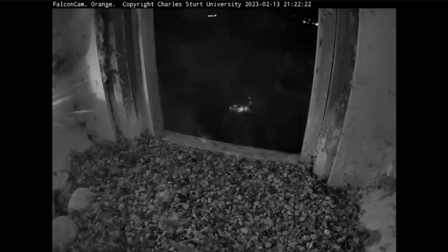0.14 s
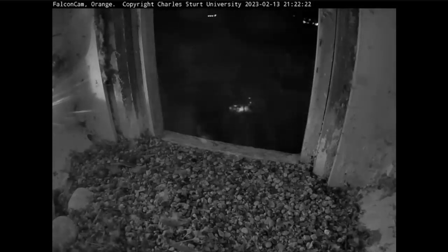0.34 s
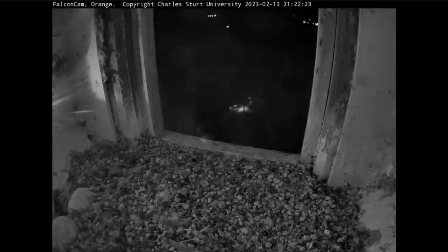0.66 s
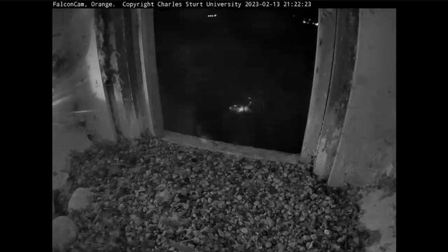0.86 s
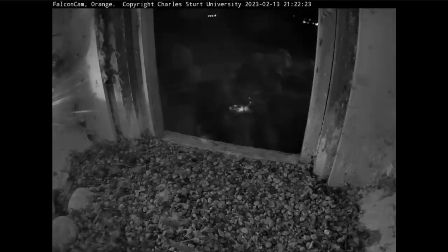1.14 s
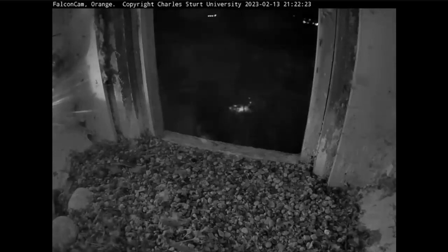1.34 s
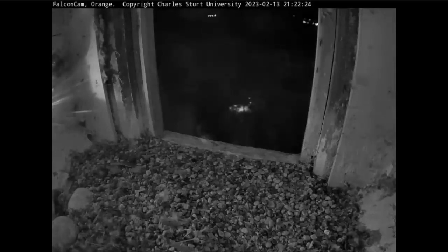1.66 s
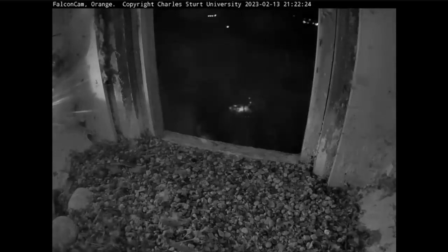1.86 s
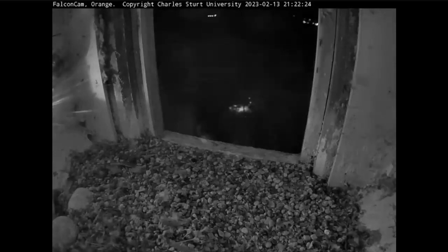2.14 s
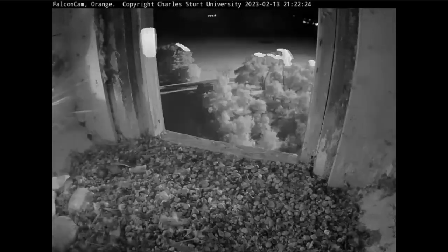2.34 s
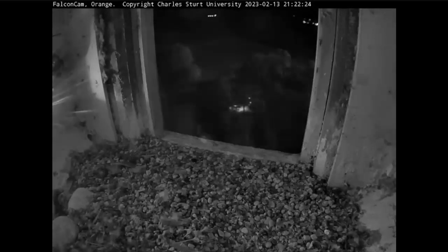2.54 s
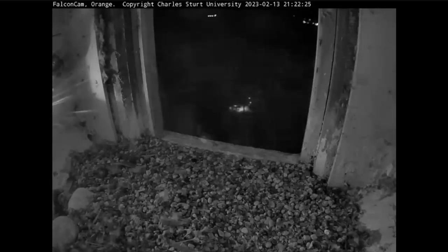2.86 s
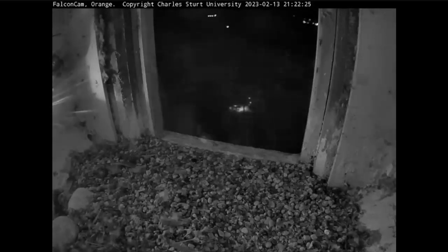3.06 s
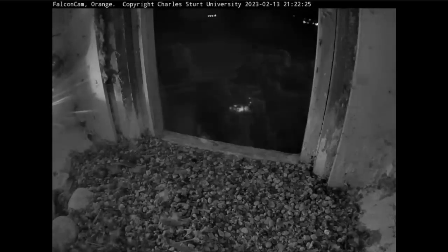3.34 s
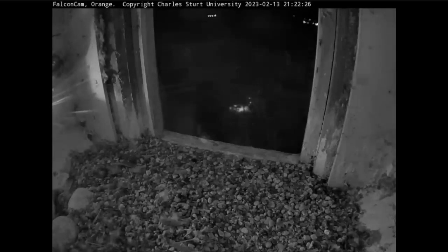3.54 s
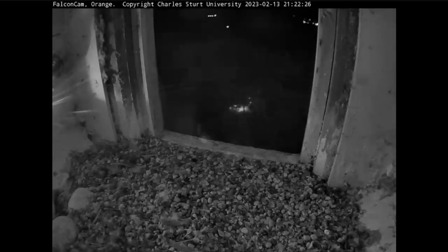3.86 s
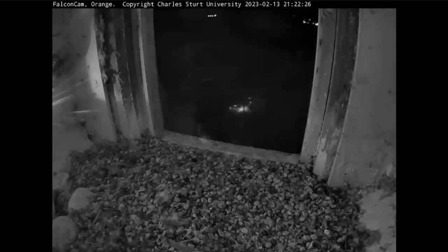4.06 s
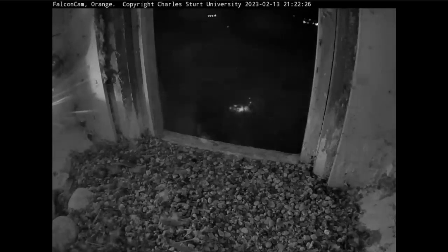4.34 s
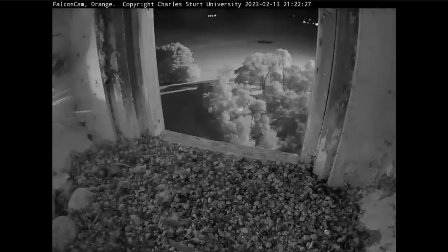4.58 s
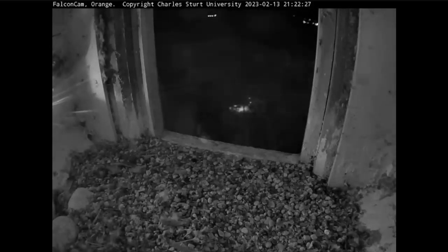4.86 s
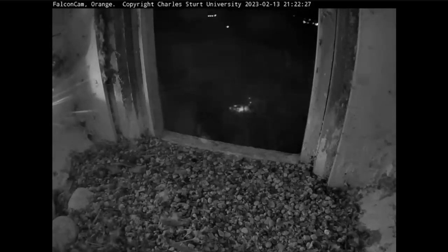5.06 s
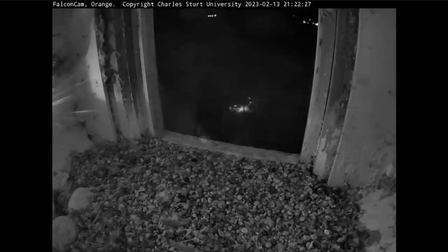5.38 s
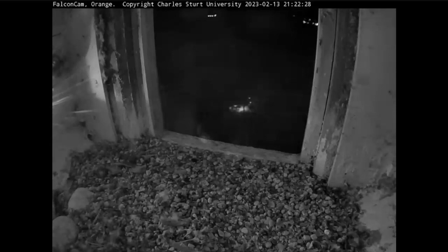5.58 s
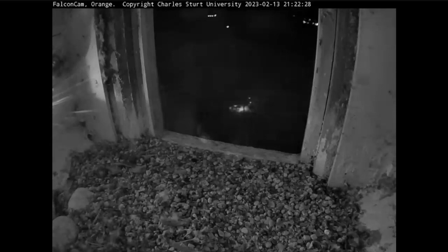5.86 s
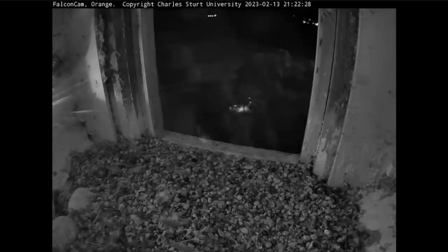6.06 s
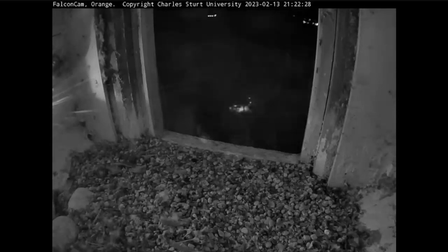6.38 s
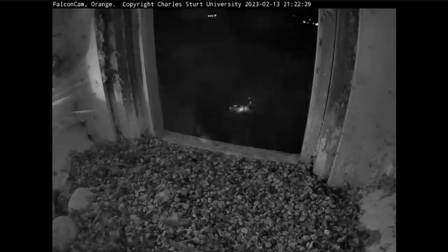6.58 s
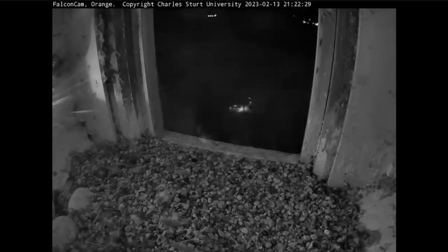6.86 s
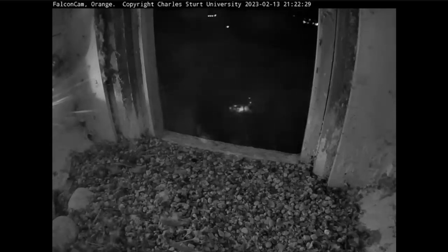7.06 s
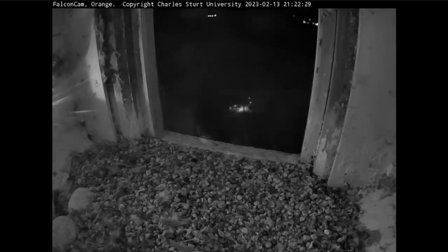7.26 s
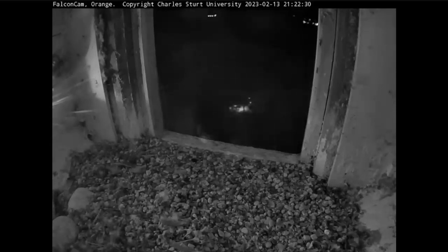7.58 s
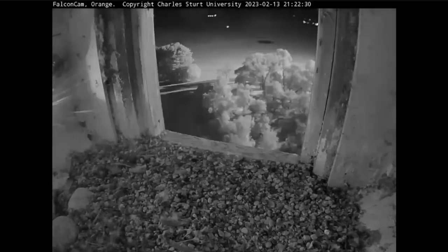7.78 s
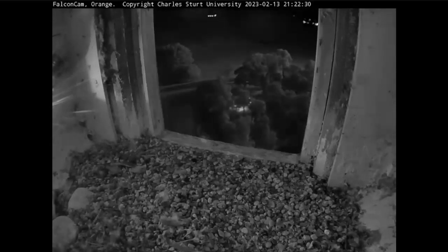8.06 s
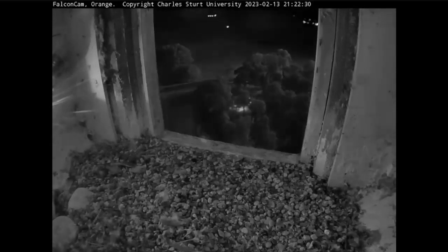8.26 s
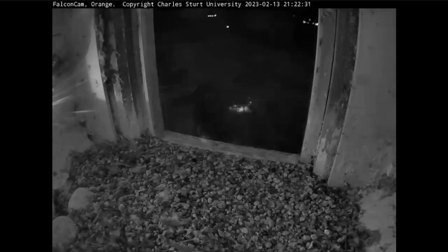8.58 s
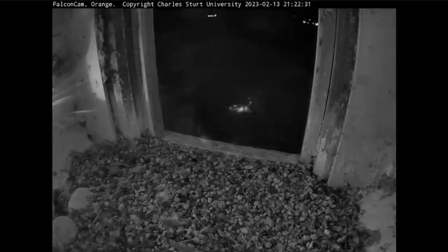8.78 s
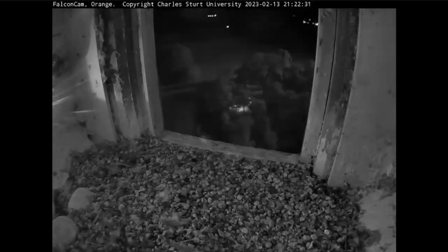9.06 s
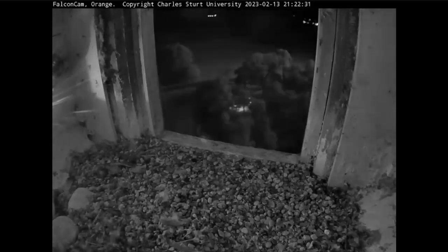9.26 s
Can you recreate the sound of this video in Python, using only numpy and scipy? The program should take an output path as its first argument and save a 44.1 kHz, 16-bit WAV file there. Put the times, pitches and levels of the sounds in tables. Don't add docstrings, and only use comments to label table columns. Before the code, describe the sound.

Night, high on a tower, a small microphone inside a gravel-floored wooden box. Faint low hum and slight hiss, then seven sharp firework bangs over about eight seconds, each overloading the microphone with a hollow boxy thump and crack, slapping echoes a fraction of a second later, and a long rumble. Weak clicking pops fall between.

```python
import sys
import numpy as np
from scipy import signal
from scipy.fft import rfft, irfft, next_fast_len
from scipy.io import wavfile

SR = 44100
rng = np.random.default_rng(int(sys.argv[2]) if len(sys.argv) > 2 else 0)


def int16_out(signal):
    q = np.round(np.clip(np.atleast_2d(signal).T, -1, 1) * 32767)
    wavfile.write(sys.argv[1], SR, q.astype(np.int16))


def gain_from_db(level_db):
    decades = np.asarray(level_db, float) / 20
    return 10 ** decades


N = 415951

# (time [s], strength [dB], near echo shift [ms], far echo shift [ms], far echoes [dB])
BURSTS = [(0.48221, 1.0, -2.81, -5.64, 2.2), (1.67405, 2.4, -.87, -1.8, -2.2),
          (2.96205, 2.7, 1.5, 2.42, -.6), (3.71922, 2.3, .93, 2.04, -.5), (5.15383, 2.0, 2.74, 5.64, .5),
          (6.53844, .9, 1.76, 4.07, -.3), (8.38842, 1.0, .25, 1.38, .9)]
# (time [s], blast [dB], crack [dB], rumble [dB])
POPS = [(0.5559, -12.5, -26.5, -70), (0.8829, -18.5, -19.5, -61), (1.8456, -36.5, -32, -74.5),
        (2.0972, -15, -21, -60), (4.748, -21, -17.5, -54.5), (6.7433, -17.5, -12, -60.5),
        (7.7338, -18, -20, -62)]
TOWER_HZ, TOWER_T60_S = 60, 0.27


def rms_one(x):
    return x / np.sqrt(np.mean(x ** 2) + 1e-20)


def at_hz(points, hz, column):
    points = np.array(points)
    return np.interp(np.log(hz), np.log(points[:, 0]), points[:, column])


def colour(x, spectrum):
    size = next_fast_len(N)
    hz = np.maximum(np.arange(size // 2 + 1) * SR / size, 1)
    gain = gain_from_db(at_hz(spectrum, hz, column=1))
    return rms_one(irfft(rfft(x, size) * gain, size)[:N])


def butter(x, order, hz, kind="low"):
    return signal.sosfilt(signal.butter(order, hz, kind, fs=SR, output="sos"), x)


def resonate(x, b, radius, hz):
    return signal.lfilter(b, [1, -2 * radius * np.cos(2 * np.pi * hz / SR), radius * radius], x + 1e-18)


def ring(x, hz, level_db, t60_s):
    radius = gain_from_db(-60 / (t60_s * SR))
    return resonate(x, [0, gain_from_db(level_db) * np.sin(2 * np.pi * hz / SR)], radius, hz)


def housing(x):
    # (frequency [Hz], width [Hz], level [dB])
    resonances = [(1208, 109, -0.5), (1362, 106, -1.5), (1654, 51, -6.5), (2472, 39, -11.5),
                  (2700, 140, -17.5), (3118, 44, -10.5), (3610, 320, -26), (4410, 420, -26),
                  (4910, 350, -23.5), (5760, 250, -21), (6500, 570, -27.5)]
    out = 0
    for k, (hz, width_hz, level_db) in enumerate(resonances):
        radius = np.exp(-np.pi * width_hz / SR)
        b = (1 - radius * radius) / 2 * gain_from_db(level_db) * (-1) ** k
        out = out + resonate(x, [b, 0, -b], radius, hz)
    out = butter(out, 4, 950, "high")
    return signal.sosfilt(signal.cheby2(10, 50, 7400, fs=SR, output="sos"), out)


def night():
    hum_db, housing_db = -52.5, -91
    # (frequency [Hz], density [dB per Hz])
    hum_spectrum = [(15, -48), (26, -20.5), (36, -13.5), (54, -1.5), (70, -4), (87, -17), (112, -16),
                    (130, -26), (168, -13), (205, -2.5), (362, -40), (950, -65), (1240, -100), (2090, -120)]
    white = rng.standard_normal((2, N))
    low = butter(white[0], 4, 1000)
    return gain_from_db(hum_db) * colour(low, hum_spectrum) + gain_from_db(housing_db) * rms_one(housing(white[1]))


def rumble():
    onset_ms, low_late_ms = 32, 60
    burst_db, earlier_db = -30.5, -51
    housing_db, patchy_db = -13, 1.5
    # (frequency [Hz], density [dB per Hz])
    box_spectrum = [(13, -49), (22, -20), (35, -10), (48, -4), (68, 2.5), (87, -11), (160, -13),
                    (209, -1.5), (230, -9.5), (291, -16.5), (393, -35), (592, -42), (786, -57), (950, -58),
                    (1240, -90), (2090, -120)]
    # (frequency [Hz], early t60 [s], late t60 [s], late share [dB])
    fading = [(50, 1, 6.8, -7.5), (198, 0.18, 3.73, 2.5), (584, 1, 3.3, -4), (1350, 0.93, 2.2, -4.5),
              (2940, 0.65, 2.3, -1), (5860, 0.9, 2, -6.5)]

    power = np.zeros(N)
    for s, *_ in BURSTS:
        power[int(s * SR)] = gain_from_db(2 * burst_db)
    for s, _, _, rumble_db in POPS:
        power[int(s * SR)] = gain_from_db(2 * rumble_db)
    r = np.exp(-1000 / (onset_ms * SR))
    swell = signal.lfilter([(1 - r) ** 2], [1, -2 * r, r * r], power + 1e-18)
    swell[0] += gain_from_db(2 * earlier_db)

    out = 0
    edges_hz = 20 * 2 ** np.arange(0, 9.1)
    white = rng.standard_normal((2, N))
    knots = np.arange(N // 900 + 2)
    for k, (low_hz, high_hz) in enumerate(zip(edges_hz, edges_hz[1:])):
        mid_hz = np.sqrt(low_hz * high_hz)
        early_s, late_s, late_db = (at_hz(fading, mid_hz, column=c) for c in (1, 2, 3))
        fade = signal.lfilter([1], [1, -gain_from_db(-120 / (early_s * SR))], swell)
        fade += gain_from_db(2 * late_db) * signal.lfilter([1], [1, -gain_from_db(-120 / (late_s * SR))], swell)
        band = butter(white[k % 2], 2, [low_hz, high_hz], "band")
        patches = np.interp(np.arange(N) / 900, knots, rng.standard_normal(len(knots)))
        out = out + band * np.sqrt(fade) * gain_from_db(patchy_db * patches)
    low_part = np.roll(butter(out, 4, 1000), int(low_late_ms * SR / 1000))
    rms = np.sqrt(np.mean(out ** 2))
    return rms * colour(low_part, box_spectrum) + gain_from_db(housing_db) * housing(out)


CRACK_LATE_MS, BLAST_MS = 1.0, 4.62


def add(blast, crack, s, blast_db, length_ms, crack_db, tail_db):
    front_share = .31
    rise_ms, decay_ms, tail_ms = .6, 5.7, 65
    at = slice(int(s * SR), int(s * SR) + 9000)
    ms = (np.arange(at.start, at.stop) / SR - s) * 1000
    phase = ms / length_ms
    ends = np.sin(np.pi / 2 * np.clip(np.minimum(phase, 1 - phase) / front_share, 0, 1)) ** 2
    blast[at] += gain_from_db(blast_db) * ends * (1 - 2 * phase)
    late = np.maximum(ms - CRACK_LATE_MS, 0)
    rise = 1 - np.exp(-late / rise_ms)
    crack[at] += gain_from_db(crack_db) * rise * (np.exp(-late / decay_ms) + gain_from_db(tail_db) * np.exp(-late / tail_ms))


def add_bursts(blast, crack):
    tail_db = -24.5
    # (lag [ms], share of the shift [1], blast [dB], length [ms], crack [dB])
    near_echoes = [(52.18, .8, -8.5, 6.73, -5.5), (67.36, 1.52, -17.9, 6.5, -21),
                   (79.58, .76, -23.2, 6.0, -28.5)]
    # (lag [ms], share of the shift [1], blast [dB], length [ms], crack [dB])
    far_echoes = [(96.22, 1.02, -9.2, 3.63, -24), (113.1, .29, -21, 19.1, -41),
                  (117.95, .8, -30.6, 3.8, -49)]
    for s, level_db, near_ms, far_ms, far_db in BURSTS:
        add(blast, crack, s, level_db, BLAST_MS, level_db, tail_db)
        sharp_db = -3.5 + .9 * far_db
        for echoes, shift_ms, gain_db in ((near_echoes, near_ms, 0), (far_echoes, far_ms, far_db)):
            for lag_ms, share, echo_db, length_ms, crack_db in echoes:
                lag_s = (lag_ms + share * shift_ms) / 1000
                add(blast, crack, s + lag_s, echo_db + gain_db, length_ms, crack_db + sharp_db, tail_db)


def add_pops(blast, crack, clicks):
    tail_over_rumble_db, click_db = 25, 11.5
    for s, blast_db, crack_db, rumble_db in POPS:
        tail_db = rumble_db + tail_over_rumble_db - crack_db
        add(blast, crack, s, blast_db, BLAST_MS, crack_db, tail_db)
        clicks[int((s + CRACK_LATE_MS / 1000) * SR)] = gain_from_db(crack_db + click_db)


def arrivals():
    drive_db, crack_db, tower_db = -46.23, -13, -31
    box_cut_hz, crack_cut_hz, pop_cut_hz = 463, 1900, 2500
    # (frequency [Hz], level [dB], t60 [s], sign [1])
    box_modes = [(55.9, 9.96, .021, -1), (93.9, -4.05, .109, 1), (196.9, 13.4, .036, -1),
                 (206.3, 16.07, .012, 1), (207.7, 10.64, .075, 1), (245.7, 1.68, .019, 1),
                 (308.9, .38, .045, -1)]
    blast, crack, pop_crack, clicks = np.zeros((4, N))
    add_bursts(blast, crack)
    add_pops(blast, pop_crack, clicks)

    boom = ring(blast, TOWER_HZ, tower_db, TOWER_T60_S)
    for hz, level_db, t60_s, sign in box_modes:
        boom = boom + sign * ring(blast, hz, level_db, t60_s)
    boom = butter(boom, 4, box_cut_hz)

    white = rng.standard_normal(N)
    pops = butter(pop_crack * white + clicks, 2, pop_cut_hz)
    cracks = butter(crack * white + pops, 1, crack_cut_hz)
    return gain_from_db(drive_db) * boom + gain_from_db(crack_db) * housing(cracks)


def scene():
    tower_db = -57.5
    wash = butter(night() + rumble(), 4, 38, "high")
    return (arrivals() + wash + ring(wash, TOWER_HZ, tower_db, TOWER_T60_S))[None]


def band_limit(x):
    return signal.sosfilt(signal.butter(12, 16450, fs=SR, output="sos"), x)


def record(dry):
    top, offset = .1185, .0025
    hiss_db, top_cut_hz = -93.5, 17000
    # (frequency [Hz], density [dB per Hz])
    hiss_spectrum = [(1060, -37.5), (1800, -9), (1970, -9), (3090, -5), (3350, -10.5), (4100, -9),
                     (4700, 0.5), (5250, -12), (6360, 2), (7560, -12.5), (16000, -15)]
    white = butter(rng.standard_normal(N), 4, 1500, "high")
    hiss = gain_from_db(hiss_db) * colour(white, hiss_spectrum)
    clipped = np.clip(dry + offset, -top, top)
    loud = signal.sosfiltfilt(signal.cheby2(8, 40, top_cut_hz, fs=SR, output="sos"), clipped)
    settle = np.sin(np.pi / 2 * np.minimum(np.arange(N)[::-1] / 600, 1)) ** 2
    return band_limit(settle * loud + hiss)


dry = scene()
out = record(dry)
int16_out(out)
```